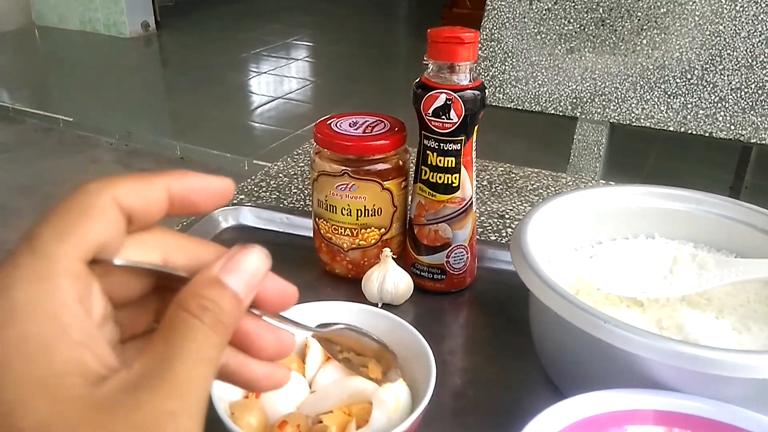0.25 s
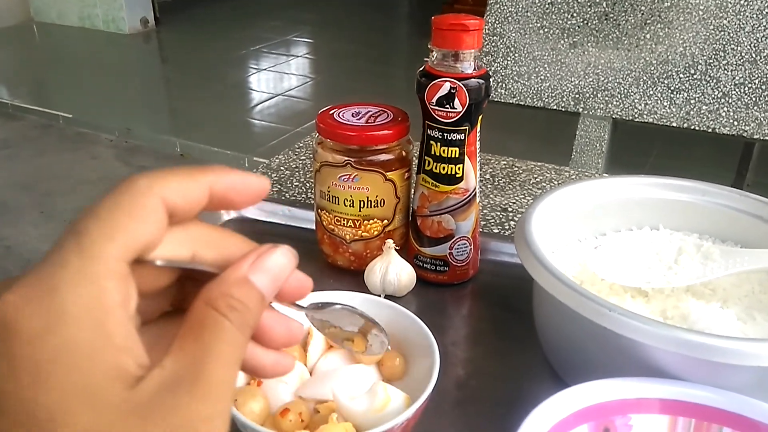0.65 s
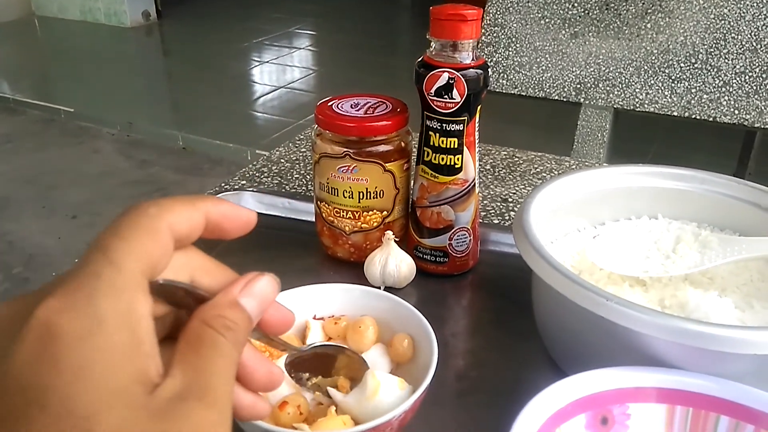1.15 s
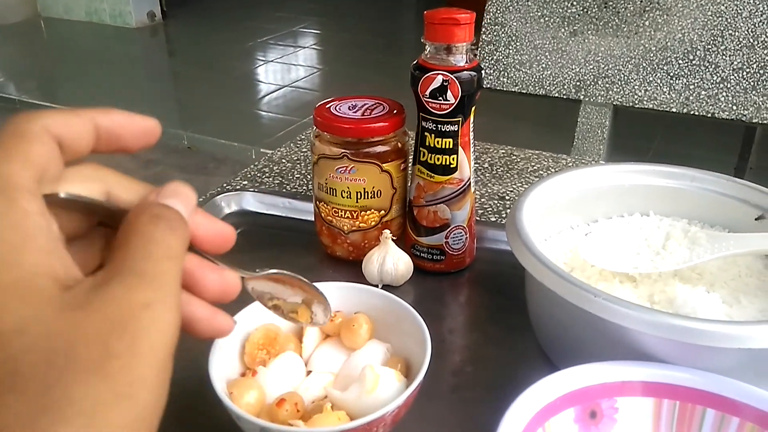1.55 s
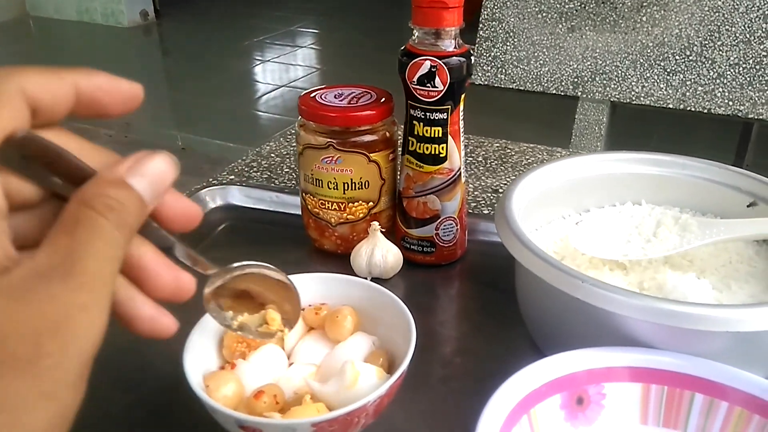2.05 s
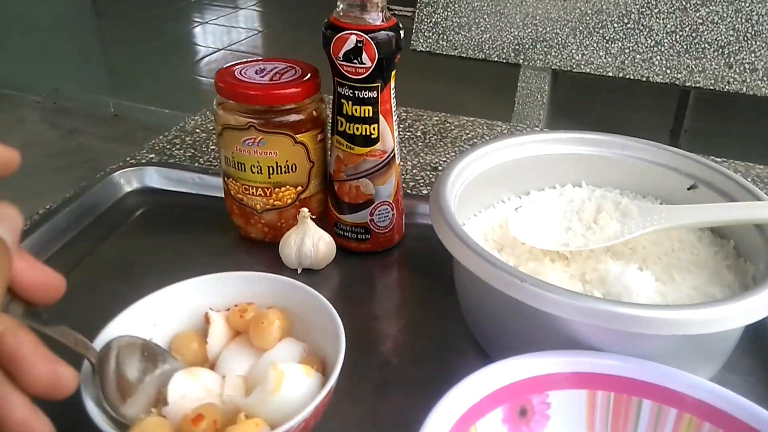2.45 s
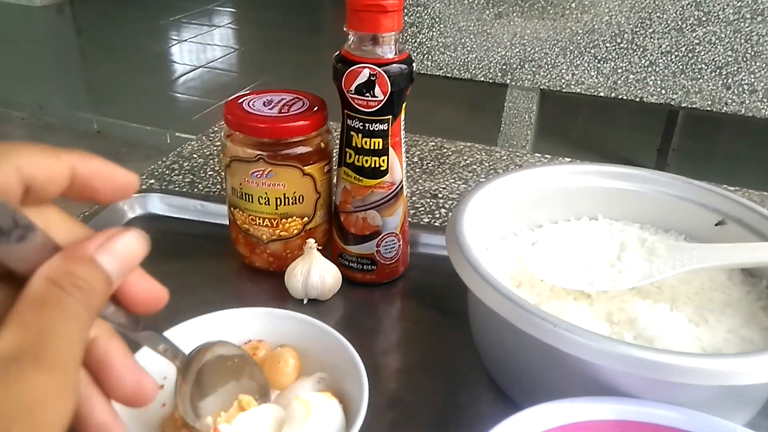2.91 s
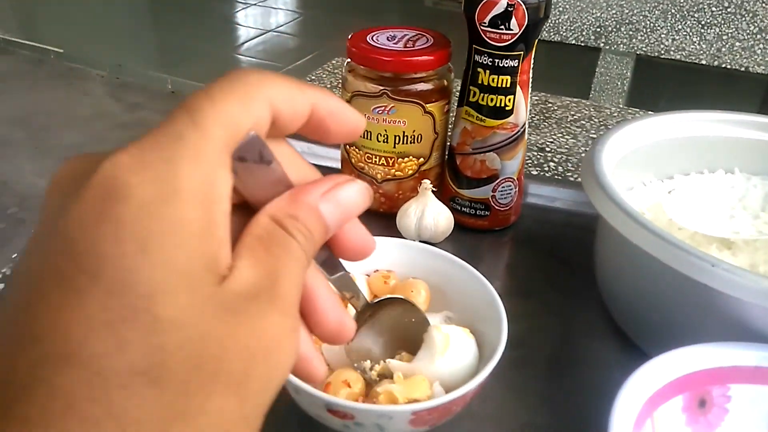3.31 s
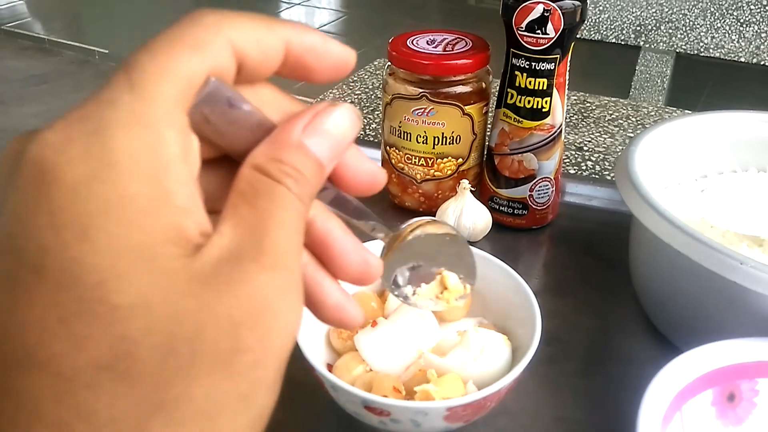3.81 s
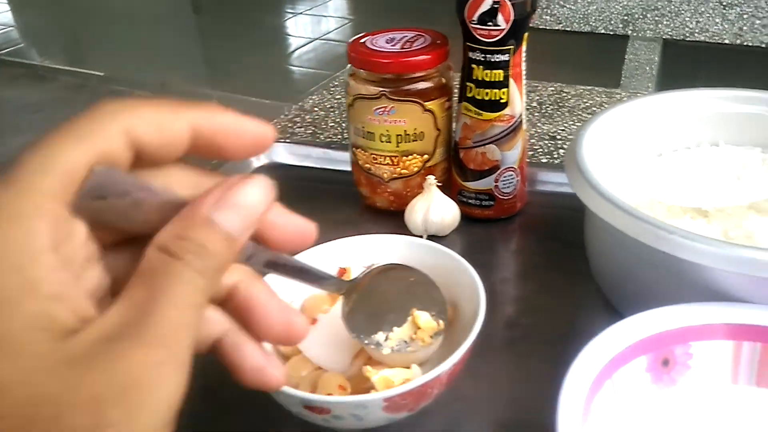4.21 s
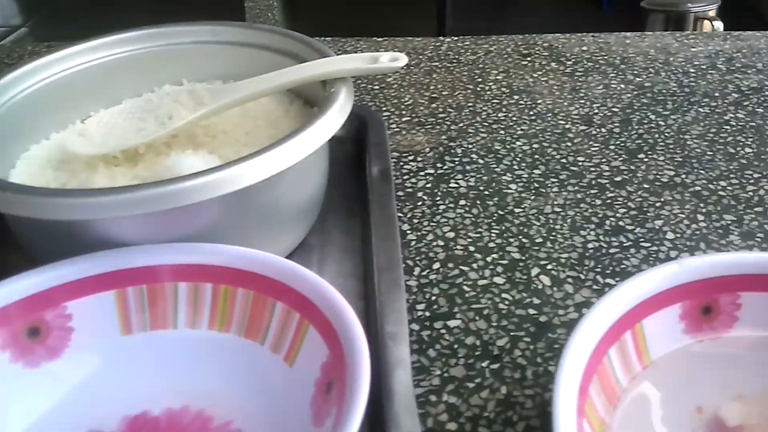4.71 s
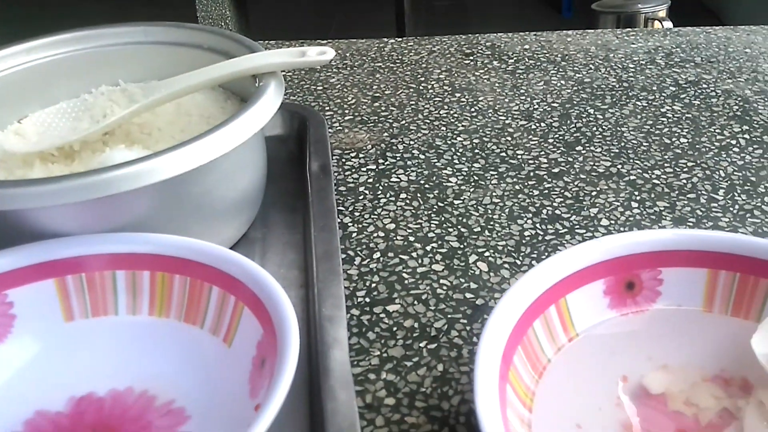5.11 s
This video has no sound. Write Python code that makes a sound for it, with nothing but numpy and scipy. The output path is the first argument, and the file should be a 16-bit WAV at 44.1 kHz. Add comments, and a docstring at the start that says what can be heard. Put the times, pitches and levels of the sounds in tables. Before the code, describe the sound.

A loud, dry hollow pop and tiny wet ticks very close to the microphone open the scene. A steel spoon then taps a small food-filled bowl on a tray, sparsely, growing to bright short clinks, a rattle and a scrape near the end. Low air thumps buffet the stereo ports, mostly left. Faint room murmur and motor hum swell under louder sounds.

```python
"""Spoon and bowl

A steel spoon cuts food in a small ceramic bowl on a tray: decaying modes and noise knocks make it clink and rattle,
and grains of friction make it drag along the glaze. Small ticks and one hollow pop, short ringing modes, come from
close by. Filtered noise and single thuds are moving air on two microphone ports, over room murmur and a motor's hum.
The recorder turns quiet passages down, so the background swells under every louder sound."""
import sys
import numpy as np
from scipy import signal
from scipy.fft import rfft, irfft, next_fast_len
from scipy.io import wavfile

SR = 44100
rng = np.random.default_rng(int(sys.argv[2]) if len(sys.argv) > 2 else 0)


def dump(signal):
    """Clip the signal to [-1, 1] and save it as 16-bit WAV at the path in sys.argv[1]."""
    limited = np.clip(np.atleast_2d(signal).T, -1, 1)
    pcm = np.round(limited * 32767).astype(np.int16)
    wavfile.write(sys.argv[1], SR, pcm)


N = 236243

# Steady murmur of the room. Each row: frequency in Hz, relative density in dB per Hz.
ROOM_TONE = [(30, -12), (62, -2), (200, -5.5), (400, -5.5), (800, -7), (1250, -8), (2000, -10),
             (3150, -14.5), (3900, -17.5), (4500, -24), (6300, -24.5), (10000, -28), (13500, -31),
             (15000, -64)]
# Likeness of the murmur in the two ports. Each row: frequency in Hz, shared part of the power from 0 to 1.
ROOM_TONE_LIKENESS = [(60, 0.37), (240, 1), (950, 0.73), (3770, 0.47), (15000, 0.22)]
ROOM_TONE_DB = -51.5

# Tones of a distant motor. Each row: multiple of the motor frequency, level in dB.
HUM_ORDERS = [(2, -68), (3, -66), (4, -64), (5, -62.5), (8, -69)]
HUM_HZ = 66.9  # mean frequency

# Course of the air on the ports. Each row: time in seconds, mean level in dB, left minus right in dB.
BUFFET = [(0.0, -48.5, -6), (0.12, -67, 0), (0.22, -50.5, 5.5), (0.43, -61.5, 9), (0.67, -47, 12),
          (0.78, -59, -10), (1.06, -59.5, 16), (1.45, -48.5, 1), (1.7, -48, 1), (1.8, -43.5, 7),
          (1.92, -54, 9), (2.05, -42, 2), (2.12, -54, 19), (2.33, -62.5, 9), (2.55, -50.5, 10.5),
          (2.73, -54, 15), (3.12, -44, -6), (3.46, -44.5, 17), (3.52, -53, -9), (3.71, -50, -7),
          (3.91, -62.5, 12.5), (4.12, -54.5, 4), (4.48, -66.5, -4.3), (5.0, -57, 0.5), (5.28, -96, 5),
          (5.36, -42.5, 13)]
# Spectrum of that air. Each row: frequency in Hz, relative density in dB per Hz.
BUFFET_COLOUR = [(25, -45), (45, 3), (80, -2.5), (200, -12), (400, -14), (800, -26.5), (1600, -53)]
# Single thuds of air. Each row: time of the peak in seconds, peak level in dB, frequency in Hz,
# port (0 left, 1 right), sign (1 push, -1 pull).
THUDS = [(0.185, -33, 190, 0, 1), (0.233, -27, 187, 0, 1), (0.295, -30, 150, 0, 1),
         (0.577, -26.5, 200, 0, -1), (0.66, -24.5, 182, 0, -1), (.699, -26, 172, 0, 1),
         (0.751, -31, 156, 1, 1), (1.407, -23.5, 116.8, 0, 1), (1.771, -25, 510, 0, 1),
         (1.774, -17.5, 232, 0, 1), (1.783, -11, 170, 0, 1), (1.806, -21.5, 175, 0, -1),
         (1.844, -11, 228, 1, -1), (1.876, -29.5, 197, 1, -1), (1.933, -29, 200, 0, 1),
         (1.972, -23.5, 180, 0, -1), (2.002, -24.5, 198, 0, -1), (2.079, -13, 205, 0, 1),
         (2.141, -25.5, 220, 0, 1), (2.147, -23, 270, 0, 1), (2.165, -21, 191, 0, -1),
         (2.186, -26, 260, 0, 1), (2.197, -23, 242, 0, 1), (2.356, -30.5, 158, 0, 1),
         (2.464, -28, 199, 0, 1), (2.494, -24.5, 184, 0, -1), (3.065, -26.5, 150, 0, -1),
         (3.101, -27.5, 198, 0, -1), (3.163, -25.5, 203, 0, 1), (3.304, -21.5, 180, 0, -1),
         (3.33, -24.5, 179, 0, -1), (3.38, -32, 200, 0, 1), (3.406, -26, 200, 0, -1),
         (3.416, -27, 178, 1, -1), (3.436, -22.5, 200, 0, -1), (3.448, -23, 206, 0, -1),
         (5.326, -29.5, 181, 0, 1), (5.344, -37, 150, 0, -1)]

# Modes of the hollow pop. Each row: frequency in Hz, level in dB, time to fall 60 dB in seconds.
POP_MODES = [(655, -20, 0.0076), (1470, -1.5, 0.013), (1484, -37.5, 0.34), (2150, -25.5, 0.02),
             (3190, -23, 0.013), (4950, -32, .008), (6070, -8.5, 0.0021), (8180, -9, 0.004),
             (12600, -25.5, 0.0054)]
POP_S, POP_TOUCH_S, POP_TOUCH_DB = 0.1152, 0.0048, -25  # burst time, lead and level of the light touch before it
# Small wet ticks. Each row: start in seconds, snap level in dB, body above snap in dB.
TICKS = [(0.872, -29.5, -30), (1.076, -28, -25), (1.081, -27.5, -8.5), (1.1088, -31.5, 8),
         (1.1124, -26.5, -3.5)]
# Modes of the bright snap, then of the lower body. Each row: frequency in Hz, relative level in dB,
# time to fall 60 dB in seconds.
TICK_SNAP = [(7600, 2, .004), (12580, -20, .004)]
TICK_BODY = [(3150, 0.2, 0.0061), (1480, -2, 0.0088)]

# Balance of near sounds at the ports before shading is scaled. Each row: frequency in Hz, left minus right in dB.
PORT_BALANCE = [(400, 0.5), (1000, 2.5), (1500, -14.5), (2000, -8.5), (2650, 1), (3400, 3), (4900, 6),
                (5800, 12), (6600, 17), (8800, -7.5), (9600, 9), (12200, 1)]
BOWL_LEAD_MS, TICK_LEAD_MS = 0.235, -0.073  # how much earlier the left port hears them

# Decay of the room. Each row: frequency in Hz, time to fall 60 dB in seconds.
ROOM_T60 = [(500, 0.51), (2000, 0.37), (6000, 0.28), (14000, .22)]
ROOM_DB, ROOM_ONSET_MS = -9.5, 2
TICK_ROOM_DB = -13  # ticks sound right by the ports and stir the room less

# Blows of spoon on bowl. Each row: start in seconds, knock level in dB, bowl level in dB, bowl family struck best
# (0 low to 4 top), loss per family away from it in dB, tray level in dB, spoon scoop level in dB,
# spoon handle level in dB, time constant of the ring's swell in ms, ring length as a share of the free ring.
CLINKS = [(.5400, -24.5, -17.5, 0.95, 14, -20, -69, -30, 1.1, 0.31),
          (.5475, -36.5, -37, 0.9, 25, -51, -79, -62, .8, 0.36),
          (1.252, -37, -43.5, 1.1, 3.5, -33, -64, -37, 0.84, 0.16),
          (1.945, -36.5, -46, 0.2, 8, -29.5, -65, -75, 1.4, 0.68),
          (2.349, -47, -25, 2.01, 33, -60, -37, -37, 1.8, 0.17),
          (2.351, -63, -25, 0.055, 5, -58, -60, -60, 4.3, 0.21),
          (2.907, -47, -68, 0.3, 6, -55, -69, -76, 1.9, 0.96),
          (3.3501, -29, -18, 1.65, 8, -14, -22.5, -24.5, 0.73, 0.21),
          (3.359, -42.5, -27.5, 0.05, 11, -33, -66, -62, 0.97, 0.5),
          (3.7302, -26, -28.5, 0.4, 4, -18.5, -10, -19, 1.37, 0.17),
          (3.748, -53, -44, 1.2, 4, -22, -47, -54.5, 2.7, 0.26),
          (4.0860, -31, -4, 1.73, 6.5, -34, -22, -17.5, 1.46, 0.13),
          (4.110, -49.5, -35.5, 0.34, 12, -41.5, -43, -47, 2, 0.26),
          (4.4140, -25.5, -13.5, 1.2, 2.5, -26.5, -14.5, -20, 0.57, 0.18),
          (4.4205, -24.5, -1, 2.01, 21.5, -30.5, -38.5, -39.5, 5.7, 0.39),
          (4.4365, -25.5, -21.5, 0.6, 4.5, -29.5, -38, -42.5, 0.66, 0.21),
          (4.6405, -42, -13, 1.146, 5, -48.5, -29, -11, 1.7, 0.21),
          (4.6485, -25, -15, 2.4, 3.5, -27.5, -34.5, -21, 3.5, 0.51),
          (4.685, -53, -24.5, 2.1, 2, -30.5, -44, -49.5, 0.95, 0.33),
          (4.7132, -37.5, -17, 1.5, 5, -38.5, -42, -27, 1.3, 0.4),
          (4.74, -31.5, -24.5, 2.6, 7.5, -31, -46, -33.5, 1.5, 0.41),
          (4.793, -42.5, -35, 1.05, 7, -63, -63, -53, 2.6, 1.6)]
# Mode families: five of the bowl from low to top, then tray, spoon scoop and spoon handle.
# Each row within a family: frequency in Hz, relative level in dB, free time to fall 60 dB in seconds.
MODE_FAMILIES = [
    [(1745, -1, .13), (1800, -3, .11)],
    [(3420, -1, .24), (3520, -12, .15)],
    [(5810, -1, .2), (5890, -16, .16)],
    [(8790, -1, .15), (8150, -12, .15), (9580, -13, .15)],
    [(12230, -1, .12), (13100, -5, .15), (11900, -8, .1)],
    [(1250, -3, .05), (1500, -1, .06), (2050, -2, .07), (2300, -6, .07), (2650, -5, .07)],
    [(4920, -1, .1), (4780, -4, .08), (5100, -4, .1), (5280, -5, .08), (4150, -12, .1)],
    [(6630, -1, .1), (6350, -3, .08), (3030, -1, .15), (5560, -4, .1)],
]
# Knock noise before hardness shapes it. Each row: frequency in Hz, relative density in dB per Hz.
KNOCK = [(500, -16), (1000, -4), (1500, -0.5), (2500, 9), (4000, -6), (7000, -15.5), (10000, -16),
         (13000, -18), (16000, -58)]
KNOCK_T60_S = 0.27
CRACK_DB, CRACK_T60_S = 13, 0.029  # the first contact, above the knock
KNOCK_CORNER_HZ, HARDNESS = 4250, 0.39  # treble corner; dB of treble per dB of contact hardness
RING_FLUTTER_DB, RING_FLUTTER_MS = 2.5, 5.6  # shifting contact with food and fingers roughens the ring
RADIATION_SPREAD = 1  # (radians) each mode reaches the two ports with a phase gap of its own

# Strokes over the glaze. Each row: start in seconds, length in seconds, friction noise level in dB before
# filtering, level in dB of the friction that drives the ringing.
STROKES = [(2.64, 0.029, -50, -91), (2.4, .05, -52.5, -70), (2.907, 0.069, -51, -73),
           (4.423, .13, -38, -42), (4.636, 0.082, -24.5, -34.5)]
# How strongly friction excites each mode family, in the order of the families: level in dB.
DRAG_FAMILY_DB = [-23, -21.5, -23, -29, -41.5, -36, -50, -36]
STROKE_ATTACK_S, STROKE_RELEASE_DB_PER_S = 0.0028, 324

QUIET_BELOW_DB, QUIET_SLOPE, QUIET_DEPTH_DB, QUIET_WINDOW_MS = -33.5, 0.6, 12, 16.6
CUTOFF_HZ = 16900


def amp(db):
    """Amplitude ratio: 20 dB are a factor of ten."""
    return 10 ** (np.asarray(db) / 20)


def rms_one(x):
    """Normalisation: division by the root mean square gives rms 1."""
    return x / np.sqrt(np.mean(x ** 2) + 1e-20)


def in_time(rows):
    """Linear interpolation: each column becomes a course over the whole scene."""
    s, *columns = np.transpose(rows)
    return [np.interp(np.arange(N) / SR, s, column) for column in columns]


def at_hz(points, hz):
    """Spectral interpolation: values run straight over logarithmic frequency."""
    points_hz, values = np.transpose(points)
    return np.interp(np.log(hz + 1), np.log(points_hz + 1), values)


def butter(x, order, hz, kind="low"):
    """Linear filtering: a maximally flat filter passes one range of frequencies."""
    return signal.sosfilt(signal.butter(order, hz, kind, fs=SR, output="sos"), x)


def coloured(spectrum, shape):
    """Spectral shaping: white noise is weighted by frequency and brought to rms 1."""
    white = rfft(rng.standard_normal(shape))
    hz = np.fft.rfftfreq(shape[-1], 1 / SR)
    return rms_one(irfft(white * amp(at_hz(spectrum, hz)), shape[-1]))


def drift(rate_hz):
    """Smoothed chance: two equal poles turn white noise into a slow course per channel, rms 1 overall."""
    r = np.exp(-2 * np.pi * rate_hz / SR)
    slow = signal.lfilter([1], [1, -2 * r, r * r], rng.standard_normal((2, N + SR)))
    return rms_one(slow)[:, SR:]


def add(track, s, sound):
    """Superposition: a sound is summed into the track from a given second."""
    start = round(s * SR)
    track[start:start + len(sound)] += sound[:N - start]


def room_tone():
    """Partial coherence: a shared and an opposed noise make the distant murmur of air and machines."""
    mid, side = rfft(coloured(ROOM_TONE, (2, N)))
    alike = np.clip(at_hz(ROOM_TONE_LIKENESS, np.fft.rfftfreq(N, 1 / SR)), 0, 1)
    opposed = np.array([side, -side])
    return amp(ROOM_TONE_DB) * irfft(np.sqrt(alike) * mid + np.sqrt(1 - alike) * opposed, N)


def hum():
    """Harmonic rotation: orders of a motor keep whole multiples of a speed that wavers slightly."""
    turns = np.cumsum(HUM_HZ * (1 + .006 * drift(1.5)[0])) / SR
    return sum(amp(db) * np.sin(2 * np.pi * (round(k) * turns + rng.random())) for k, db in HUM_ORDERS)


def buffeting():
    """Local turbulence: each port has its own lumpy low noise and thuds of air about one cycle long."""
    db, pan_db = in_time(BUFFET)
    port_db = db + pan_db * np.array([[.5], [-.5]])
    lumps_db = 2.96 * drift(27)
    out = amp(port_db + lumps_db) * coloured(BUFFET_COLOUR, (2, N))
    t = np.arange(-SR // 50, SR // 50) / SR
    for s, peak_db, hz, port, sign in THUDS:
        bell = np.exp(-(2.89 * hz * t) ** 2)
        thud = np.sign(sign) * amp(peak_db) * bell * np.cos(2 * np.pi * hz * t)
        add(out[int(port > .5)], s + t[0], thud)
    return out


def cavity(modes):
    """Cavity resonance: each mode swells over two and a half cycles while it decays exponentially."""
    out, t = 0, np.arange(SR // 4) / SR
    for hz, db, t60 in modes:
        swell = np.sin(np.pi / 2 * np.minimum(t * hz / 2.5, 1)) ** 2
        decay = amp(db + 60 * (1.29 / hz - t) / t60)  # reaches the mode's level after 1.29 cycles
        out = out + decay * swell * np.sin(2 * np.pi * hz * t)
    return out


def ticks():
    """Impulsive resonance: a touch and a pop, then ticks made of a bright snap and a lower body."""
    out = np.zeros(N)
    add(out, POP_S - POP_TOUCH_S, amp(POP_TOUCH_DB) * cavity(TICK_SNAP))
    add(out, POP_S, cavity(POP_MODES))
    for s, db, body_db in TICKS:
        add(out, s, amp(db) * (cavity(TICK_SNAP) + amp(body_db) * cavity(TICK_BODY)))
    return out


def at_ports(x, lead_ms, shading):
    """Arrival difference: two ports hear a sound a moment apart, and hand and casing shade it differently."""
    size = next_fast_len(N)
    hz = np.fft.rfftfreq(size, 1 / SR)
    # each port takes half of the level difference and half of the delay
    half = amp(shading * at_hz(PORT_BALANCE, hz) / 2) * np.exp(1j * np.pi * hz * lead_ms / 1000)
    return irfft(rfft(x, size) * np.array([half, 1 / half]), size)[:, :N]


def room(x):
    """Diffuse reverberation: echoes are noise dying away band by band, independent in each port."""
    t, echo = np.arange(SR // 2) / SR, 0
    for low in 400 * 2. ** np.arange(5):
        band = butter(rng.standard_normal((2, len(t))), 2, [low, min(2.42 * low, 16000)], "band")
        echo = echo + band * amp(-60 * t / at_hz(ROOM_T60, 2 * low))
    echo = echo * (1 - np.exp(-1000 * t / ROOM_ONSET_MS))
    unit_echo = echo / np.sqrt(np.mean(np.sum(echo ** 2, axis=1)))
    return amp(ROOM_DB) * signal.fftconvolve(x, unit_echo, axes=1)[:, :N]


def knock(t, knock_db, hardness_db):
    """Contact stiffness: a hard contact makes the knock noise brighter and thinner."""
    noise = coloured(KNOCK, t.shape)
    bass_gain = np.minimum(amp(-.4 * (hardness_db + 3.0)), 1.5)
    noise += (bass_gain - 1) * butter(noise, 2, 1400)
    treble_gain = amp(min(HARDNESS * (hardness_db + 10.5), 3))
    noise += (treble_gain - 1) * butter(noise, 2, KNOCK_CORNER_HZ, "high")
    dying = amp(-16 - 60 * t / KNOCK_T60_S) + amp(CRACK_DB - 60 * t / CRACK_T60_S)
    return amp(knock_db) * dying * (1 - np.exp(-t / 0.0012)) * noise


def clinks():
    """Modal excitation: each blow knocks and sets all modes ringing; food and fingers damp the ring."""
    out, t = np.zeros((N, 2)), np.arange(SR // 3) / SR
    for s, knock_db, bowl_db, best, loss_db, *others_db, swell_ms, share in CLINKS:
        family_db = [*(bowl_db - loss_db * abs(np.arange(5) - best)), *others_db]
        # a hard contact reaches the high modes of the bowl
        sound = knock(t, knock_db, family_db[3] - knock_db) * np.ones((2, 1))
        swell = 1 - np.exp(-1000 * t / max(swell_ms, .1))
        for modes, db in zip(MODE_FAMILIES, family_db):
            for hz, mode_db, t60 in modes:
                phase = rng.uniform(0, 2 * np.pi) + RADIATION_SPREAD * rng.standard_normal((2, 1))
                steps = rng.standard_normal(size=200)
                flutter_db = RING_FLUTTER_DB * np.interp(1000 * t / RING_FLUTTER_MS, np.arange(200), steps)
                decay_db = -60 * t / (t60 * max(share, .05))
                level = amp(db + mode_db + flutter_db + decay_db)
                sound += swell * level * np.sin(2 * np.pi * hz * t + phase)
        add(out, s, sound.T)
    return out.T


def drag():
    """Friction excitation: uneven grains are heard directly and through every mode, stroke by stroke."""
    happens = rng.random(N) < 4000 / SR  # 4000 grains per second on average
    sizes = amp(3 * np.minimum(rng.exponential(1, N), 4))
    grains = rms_one(happens * sizes * rng.choice([-1, 1], N))
    t, rub, ring = np.arange(N) / SR, np.zeros(N), np.zeros(N)
    for s, length, noise_db, ring_db in STROKES:
        rise = np.clip((t - s) / STROKE_ATTACK_S, 0, 1)
        fade = amp(-STROKE_RELEASE_DB_PER_S * np.maximum(t - s - length, 0))
        rub += amp(noise_db) * rise * fade
        ring += amp(ring_db) * rise * fade
    out = butter(rub * grains, 3, [1200, 6000], "band")
    drive = ring * grains + 1e-18
    for modes, db in zip(MODE_FAMILIES, DRAG_FAMILY_DB):
        for hz, mode_db, t60 in modes:
            # two-pole resonator, damped to 0.29 of the free ring
            r, w = amp(-60 / (0.29 * t60 * SR)), 2 * np.pi * hz / SR
            out += amp(db + mode_db) * signal.lfilter([0, np.sin(w)], [1, -2 * r * np.cos(w), r * r], drive)
    return out


def scene():
    """Superposition at the ports: near sounds, their echoes, moving air, murmur and hum add up."""
    bowl = butter(clinks() + drag(), 2, 500, "high")  # clinks and strokes carry little below 500 Hz
    table = at_ports(bowl, BOWL_LEAD_MS, 0.91)
    close = at_ports(ticks(), TICK_LEAD_MS, 0.5)
    echoes = room(table + amp(TICK_ROOM_DB) * close)
    return table + close + echoes + buffeting() + room_tone() + hum()


def record(dry):
    """Downward expansion: low level lowers the gain; the microphone loses both ends, peaks are rounded."""
    dry = butter(dry, 3, 45, "high")
    dry = butter(dry, 4, 14000)
    r = np.exp(-1000 / (QUIET_WINDOW_MS * SR))
    power = np.mean(dry ** 2, axis=0)
    smooth_power = signal.lfilter([1 - r], [1, -r], power, zi=[amp(2 * ROOM_TONE_DB)])[0]
    level_db = 10 * np.log10(smooth_power)
    gain_db = np.clip(QUIET_SLOPE * (level_db - QUIET_BELOW_DB), -QUIET_DEPTH_DB, 0)
    gain_db = np.append(gain_db[88:], np.full(88, gain_db[-1]))  # looks 2 ms ahead
    rounded = 0.99 * np.tanh(dry * amp(gain_db) / 0.86)
    return signal.sosfilt(signal.cheby2(12, 70, CUTOFF_HZ, fs=SR, output="sos"), rounded)


dry = scene()
out = record(dry)
dump(out)
```